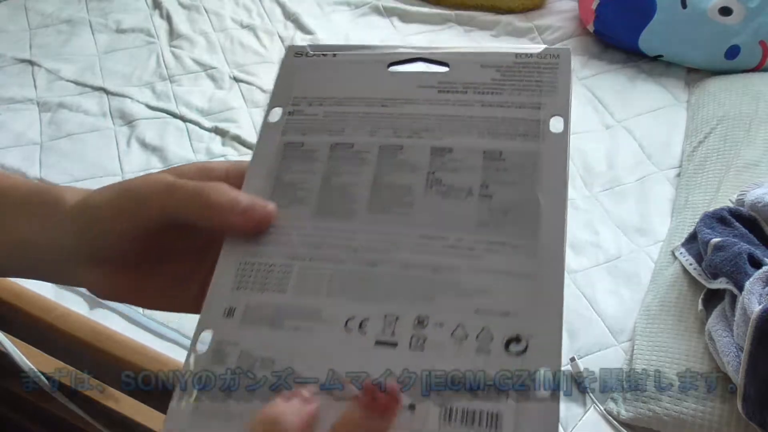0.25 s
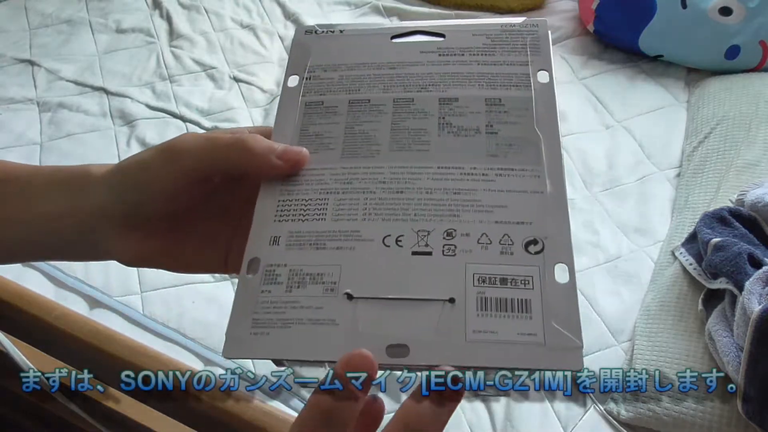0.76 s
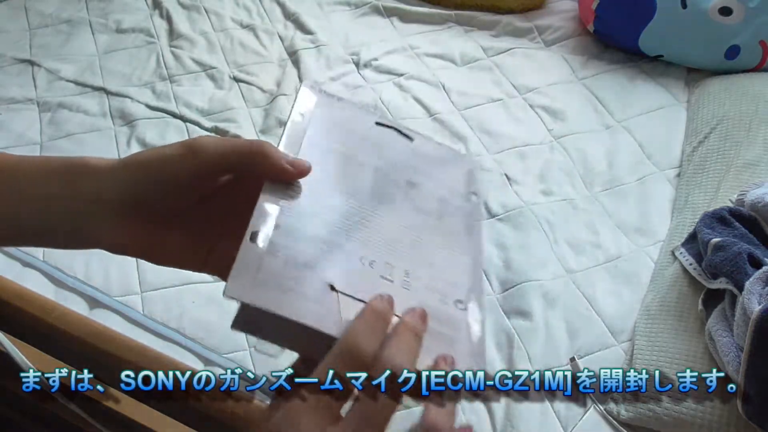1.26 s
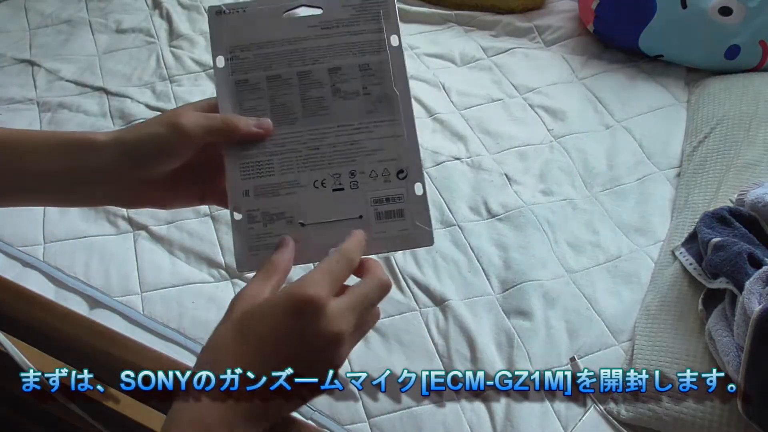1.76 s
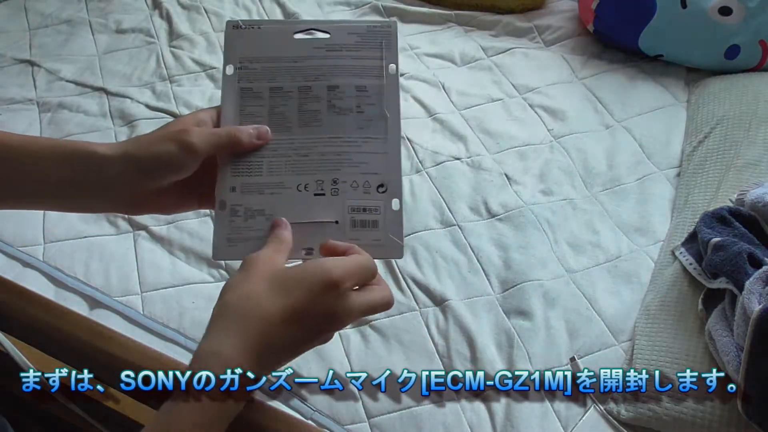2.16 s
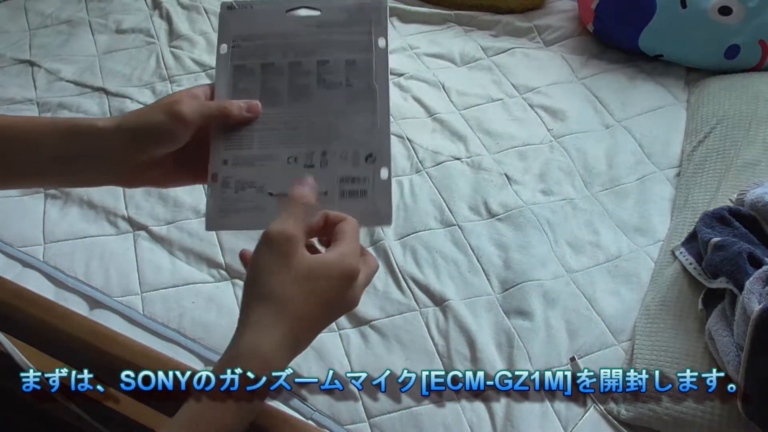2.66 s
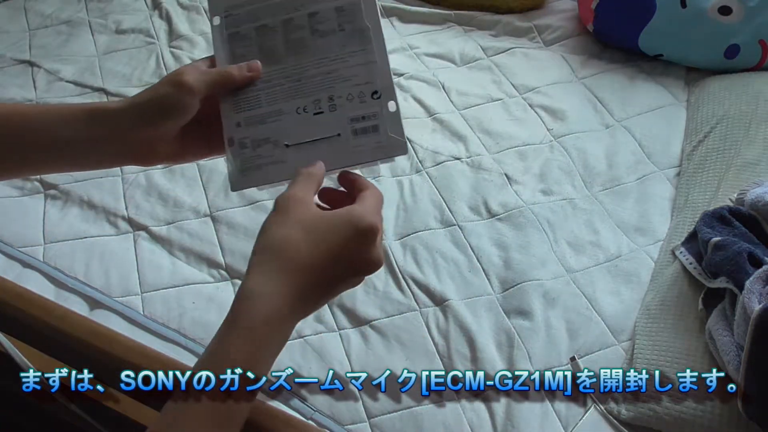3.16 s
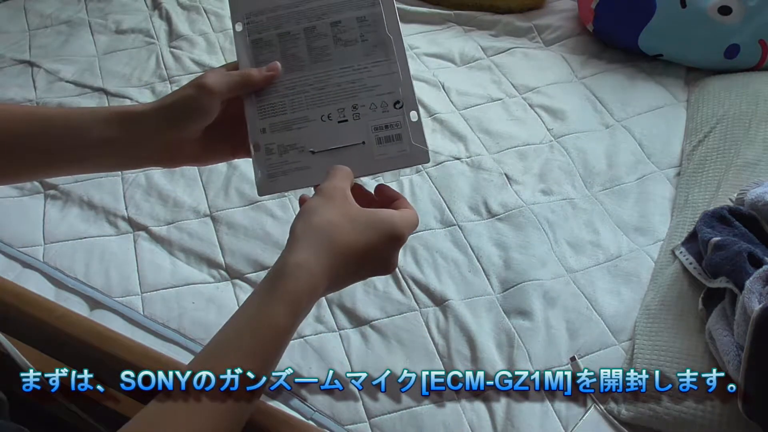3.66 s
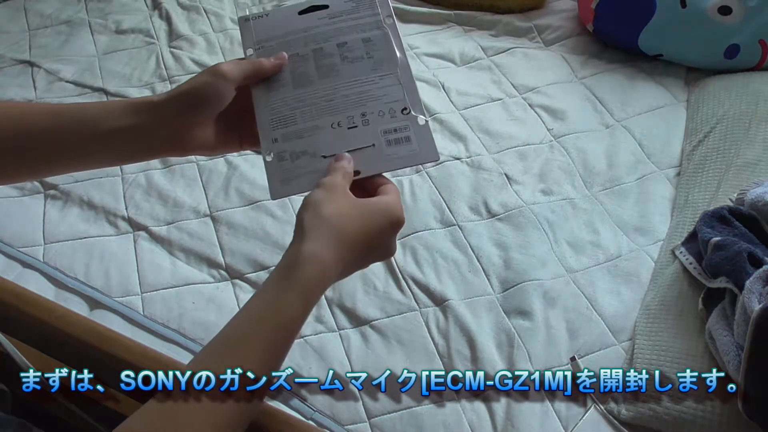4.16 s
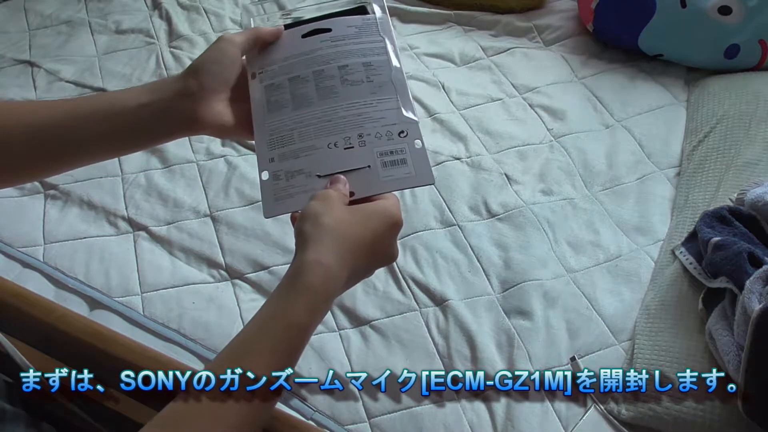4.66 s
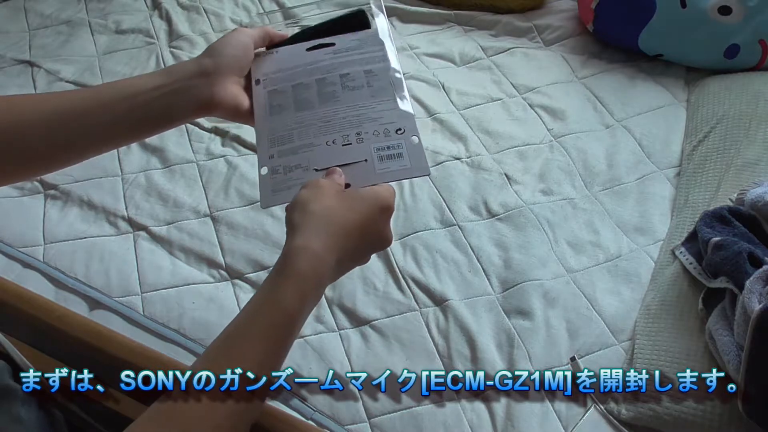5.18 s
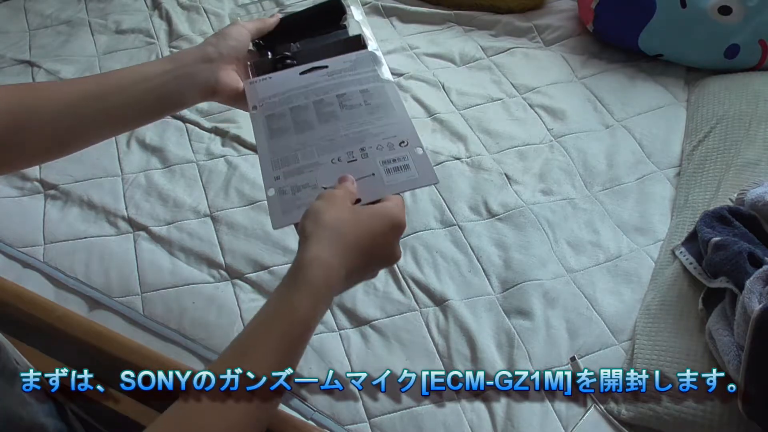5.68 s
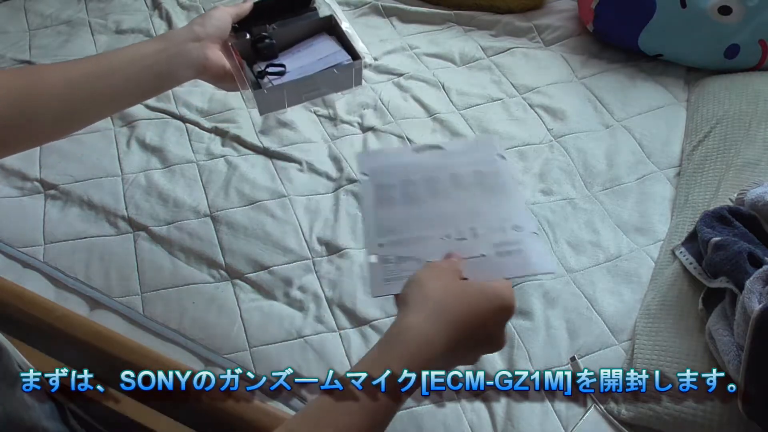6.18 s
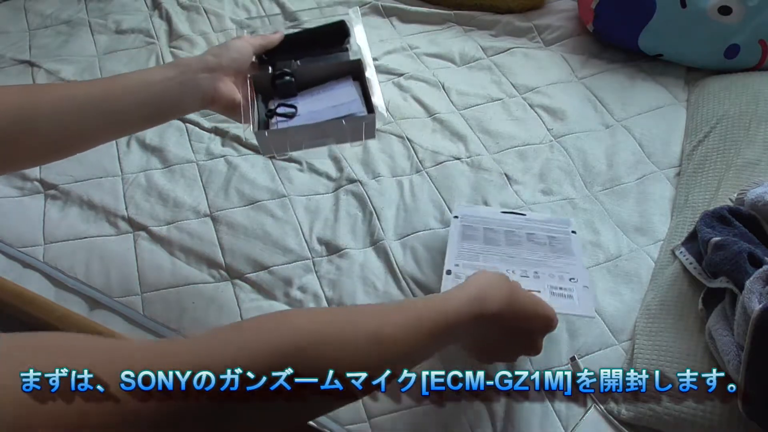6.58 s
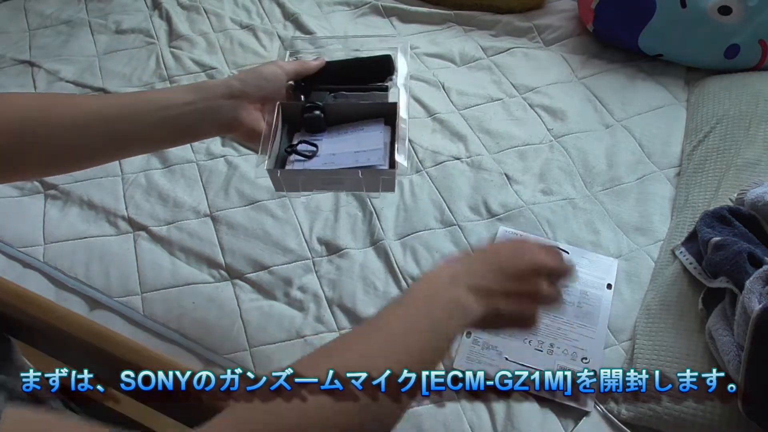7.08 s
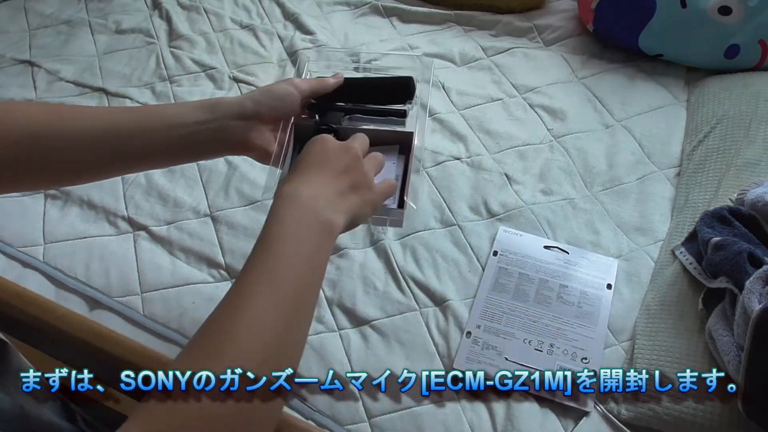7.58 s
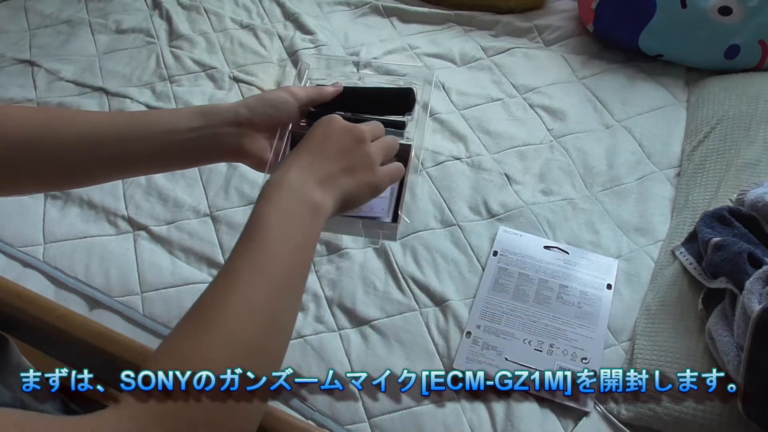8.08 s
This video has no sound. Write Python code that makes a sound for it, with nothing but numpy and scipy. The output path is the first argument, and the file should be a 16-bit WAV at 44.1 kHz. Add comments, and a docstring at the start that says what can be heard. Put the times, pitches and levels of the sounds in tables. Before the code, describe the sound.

Close stereo microphones in a small, soft bedroom pick up a stiff plastic pack being handled. Soft finger rubs and small ticks come first, then a sharp snap and a run of bright clicks as fingers pick at the edge. The paper card then slides out in several dry, rasping pulls, followed by a few looser knocks and a faint rustle. A steady, muffled ventilation rush with faint hum lies underneath.

```python
"""A steady ventilation rush with light finger rubs, then snaps and ticks of a stiff plastic blister pack.
Hands turn the pack, pick at its edge and slide the backing card out, which rasps in several pulls.
Snaps are bursts of tiny slips ringing panel and shell; the rasp is friction ringing card, shell and edge.
The rush is filtered noise with a faint hum; the room is small and soft, heard by two close microphones."""
import sys
import numpy as np
from scipy import signal
from scipy.fft import rfft, irfft
from scipy.io import wavfile
from scipy.ndimage import uniform_filter1d

SR = 44100
rng = np.random.default_rng(int(sys.argv[2]) if len(sys.argv) > 2 else 0)


def int16_out(signal):
    """Quantize to a 16-bit WAV file."""
    q = np.round(np.clip(np.atleast_2d(signal).T, -1, 1) * 32767)
    wavfile.write(sys.argv[1], SR, q.astype(np.int16))


N = 367353

# ventilation rush and microphone hiss, spectrum shape: freq_hz [Hz], density_db [dB per Hz, relative]
AIR_SPECTRUM = [(25, -25.5), (60, -20.5), (110, -12), (230, 2.5), (430, -4.5), (560, -2.5), (850, -10),
                (1500, -18.5), (1800, -27.5), (2400, -26), (2800, -30.5), (6200, -37), (8600, -29.5),
                (9700, -23.5), (10700, -28.5), (15500, -32)]
# likeness of the rush at the two microphones: freq_hz [Hz], likeness [-1..1]
AIR_LIKENESS = [(40, 0.15), (130, 0.89), (290, 0.87), (650, 0.55), (1400, 0.17), (6000, 0.4),
                (15000, -0.33)]
# light rubs of fingers and card on the pack:
# start_s [s], length_s [s], level_db [dB], card_body_db [dB re level], edge_fizz_db [dB re level]
RUB_EVENTS = [(-.04, 0.33, -64.5, 3, 6), (.17, 0.273, -68, 2, 5.5), (1.29, 0.21, -76.5, 10.5, 8),
              (1.398, 0.068, -57, -2.5, 0), (1.51, 0.2, -63.5, 3, 8.5), (1.75, 0.18, -64.5, -3, 0.5),
              (1.915, 0.11, -64, 5.5, -4.5), (2.0, 0.22, -60, 3, 2.5), (2.17, 0.25, -62.5, 2.5, 1),
              (2.66, 0.21, -65.5, -5, -4), (2.75, 0.074, -56, -1, -0.5), (2.841, 0.055, -56.5, 0.5, -4),
              (2.891, 0.096, -59, 3, -2.5), (3.141, 0.048, -60, 1.5, -1.5), (3.26, 0.2, -70.5, 2, -2),
              (4.86, 0.23, -67, -1, -3), (6.39, 0.097, -74.5, -2, 4), (7.013, .055, -60, 6, 5.5),
              (7.525, 0.31, -65.5, 9, -.5), (7.78, 0.41, -78.5, 9, 0)]
# snaps and taps on the pack: start_s [s], contact_s [s], thump_db [dB], panel_pitch_hz [Hz],
# panel_db [dB], shell_pitch_hz [Hz], shell_db [dB], crack_db [dB]
SNAP_EVENTS = [(0.163,0.0056,-56,594,-48,4650,-69,-51), (0.287,.0015,-65,726,-54,4770,-67,-61),
               (.385,0.0074,-48,684,-49,4500,-53.5,-52.5), (1.153,0.0072,-44,660,-40.5,4900,-60,-49),
               (1.199,0.0016,-54,555,-53,4640,-58,-55.5), (1.5014,0.00051,-34,950,-29,4240,-34.5,-41),
               (1.507,0.0031,-44.5,704,-40,4620,-57,-52), (1.618,0.016,-51,570,-43,4950,-49.5,-65),
               (1.689,0.025,-51,557,-40,4100,-60,-56.5), (2.08,0.0026,-45,657,-34.5,2330,-38,-49),
               (2.0811,0.0023,-43,497,-43,4080,-31,-33), (2.192,0.011,-45,580,-46.5,4990,-52,-53),
               (2.233,0.0068,-52,643,-44.5,4450,-47,-53), (2.3314,0.0009,-51,584,-52,3560,-46.5,-52),
               (2.422,0.0065,-49,550,-33.5,4000,-39,-44.5), (2.443,0.0032,-50,550,-41.5,4460,-47,-61),
               (2.528,.0022,-52,586,-54,4100,-63.5,-70), (2.6165,0.0016,-39,727,-27.5,4500,-25.5,-30),
               (2.779,0.0047,-49,620,-48.5,4330,-39,-40.5), (2.801,0.0023,-43.5,577,-42,3530,-51,-59),
               (2.8795,0.0011,-56,507,-45.5,4330,-50,-52), (3.294,0.0014,-66,464,-46.5,4550,-53.5,-54),
               (3.326,0.0044,-52,460,-46.5,4280,-64,-66), (3.4065,0.0064,-62,540,-37.5,4300,-46.5,-48),
               (3.5201,0.0008,-64,570,-42,4060,-37.5,-41), (4.261,.002,-50,493,-57,4500,-59.5,-69),
               (5.303,0.004,-44.5,630,-43,3760,-47.5,-51), (5.564,0.0046,-58,543,-53.5,5100,-58.5,-65),
               (5.966,0.0063,-64,723,-30.5,4270,-55,-59), (5.98,0.0079,-45,770,-46,4400,-35.5,-35.5),
               (6.083,0.0072,-66,573,-69,3740,-48,-38.5), (6.934,0.021,-39.5,670,-35,3570,-47.5,-41.5),
               (7.0641,0.00055,-44,1146,-42.5,4000,-42,-40), (7.068,0.0081,-47,980,-47,4500,-46,-55),
               (7.27,0.016,-43,725,-40.5,3620,-50,-48), (7.538,0.011,-58,1000,-50.5,3300,-56,-59)]
# the whole pack pushed against the hand: freq_hz [Hz], gain_db [dB, relative]
THUMP_BODY = [(40, -40.5), (110, -7), (180, -6), (250, 6), (360, -3), (520, -17), (1200, -39)]
# a flat panel flexing: pitch_multiple [times its pitch], gain_db [dB, relative]
PANEL_BODY = [(.3, -30), (.6, -7), (.8, -2), (1.0, 0), (1.4, -5), (1.9, -8), (2.6, -15), (6.0, -33.5)]
# the stiff moulded shell: pitch_multiple [times its pitch], gain_db [dB, relative]
SHELL_BODY = [(.15, -41), (0.363, -13), (.52, -16.5), (0.639, -14.5), (.77, -1.5), (.93, 2), (1.08, 1.5),
              (1.249, 2), (1.499, -13.5), (2.198, -16.5)]
# the bare crack of buckling plastic: freq_hz [Hz], gain_db [dB, relative]
CRACK_BODY = [(900, -35), (2100, -5), (3000, -5), (5500, 8.5), (7300, 5.5), (9300, 5.5), (11600, -1.5),
              (13200, -6.5), (15500, -27)]
# pulls of the card along the shell: start_s [s], rise_s [s], length_s [s], level_db [dB],
# sag_db [dB lost over the length], card_body_db [dB re level], edge_fizz_db [dB re level],
# card_resonance_hz [Hz at the start], edge_resonance_hz [Hz]
PULL_EVENTS = [(3.8, 0.053, 0.1, -47.5, 3.5, 2.5, 3, 593, 11500),
               (3.963, 0.047, 0.14, -46, -3, 1.5, 0.5, 608, 7700),
               (4.305, 0.047, 0.28, -44.5, 21, 0, -1, 1380, 7070),
               (4.527, .12, 0.26, -64, -3, -3, 5, 1016, 7300),
               (5.053, 0.088, 0.3, -67.5, -6, 4, 0, 1280, 10600),
               (5.276, 0.064, 0.16, -45.5, 2.5, -1, 2.5, 696, 7700),
               (5.484, 0.047, 0.13, -66.5, 1.5, 2.5, 5, 755, 6930),
               (5.617, 0.07, 0.089, -45, 2, -1.5, 3, 788, 6700),
               (5.698, 0.047, 0.25, -51, 6, -5.5, 2, 1324, 8050),
               (5.915, 0.095, 0.066, -41, 7.5, 3.5, 2, 803, 8400)]
# the card as a sounding board: freq_hz [Hz], gain_db [dB, relative]
CARD_BODY = [(120, -19), (300, 1), (650, 3.5), (1000, 4.5), (1500, 0), (2150, -3), (2700, -14.5),
             (5000, -47)]
# fizz of the thin edges under friction: freq_hz [Hz], gain_db [dB, relative]
EDGE_BODY = [(3000, -57.5), (5200, -7), (6300, 0), (7300, 2), (8700, 1.5), (9800, -4), (11600, -2.5),
             (13200, -12), (15500, -27.5)]
# bedroom reverberation: freq_hz [Hz], t60_s [s]
ROOM_DECAY = [(200, 0.16), (700, 0.16), (1800, 0.18), (4200, 0.15), (8000, 0.16), (14000, 0.047)]
# left microphone over right for the pack's sound: freq_hz [Hz], left_over_right_db [dB]
MIC_BALANCE = [(120, 0), (250, -1), (500, 0.5), (1000, 1.5), (2000, 0), (4000, -2.2), (8000, -0.6),
               (12000, -5)]
# phase lead of the left microphone for the pack's sound: freq_hz [Hz], lead_rad [radians]
MIC_LEAD = [(2000, 0.049), (6800, 0.49), (8400, 1.54), (9200, 1.2), (10300, 0.92), (13000, 0.79),
            (15000, 1.2)]
# where the sound comes from as the hands move: time_s [s], left_over_right_db [dB]
HAND_PAN = [(1.15, 0.5), (1.5, 2.5), (2.1, 2), (2.6, 2.3), (3.8, 1.5), (6.0, 1.5), (6.95, 2.5), (7.3, 2.5)]

AIR_DB, HUM_HZ, HUM_DB = -52.5, 340.5, -65
HOLD_DB = -84  # the hands never lie quite still on the pack
# a rub swells faster than it fades; then the pitches of card, shell and edge under a finger
RUB_SKEW, RUB_CARD_HZ, RUB_SHELL_HZ, RUB_EDGE_HZ = 0.57, 857, 4600, 7400
PANEL_OVERTONE = 1.75  # a panel's second mode over its first
SHELL_HZ = 4030  # reference pitch of the shell's broad sound
SHELL_WANDER, CARD_WANDER = 0.049, 0.037  # rms share by which the grip bends each resonance
RELEASE_DB_PER_S, STOP_S = 426, 0.01  # how fast a pull dies once the hand stops; how softly it eases off
BODY_SAG = 0.58  # share of the sag that the card body follows: a slowing pull turns dull
PULL_SHELL_HZ = 3870  # the shell's pitch at the start of a pull
GLIDE_PER_S = 0.65  # share by which card and shell rise in pitch per second of pull
CUTOFF_HZ = 15900
TAPS = 4096  # samples in a snap and in the spectra of the bodies


def amp(db):
    """Decibels to gain."""
    return 10 ** (np.asarray(db) / 20)


def unit(x):
    """Scales to an rms of one."""
    return x / np.sqrt(np.mean(x ** 2) + 1e-20)


def read(points, hz):
    """Reads a table along a log-frequency axis."""
    f, value = np.transpose(points)
    return np.interp(np.log(hz + 1e-6), np.log(f), value)


def add(mix, s, sound):
    """Mixes a sound in at s seconds."""
    part = mix[max(round(s * SR), 0):][:len(sound)]
    part += sound[:len(part)]


def drift(per_s):
    """Slow random wander of rms one, with per_s turning points drawn each second."""
    knots = np.arange(0, N + SR, SR / per_s)
    return unit(np.interp(np.arange(N), knots, rng.standard_normal(len(knots))))


def ring(x, shape, pitch=1):
    """Passes x through a causal, minimum-phase body with the given spectrum, falling away past its ends."""
    f = np.fft.rfftfreq(TAPS, 1 / SR).clip(1) / pitch
    outside = abs(np.log(f / np.clip(f, shape[0][0], shape[-1][0])))
    log_gain = np.log(amp(read(shape, f))) - np.minimum(2 * outside, np.pi)
    circle = np.r_[log_gain, log_gain[-2:0:-1]]
    # the Hilbert transform of the log gain gives the minimum phase
    response = np.fft.ifft(np.exp(np.conj(signal.hilbert(circle)))).real
    return signal.oaconvolve(x, response[:TAPS // 2])[:len(x)]


def resonate(x, hz, width):
    """A resonance of gain one, width in Hz, that follows the curve hz."""
    turn = np.exp(2j * np.pi * np.cumsum(hz) / SR)
    r = np.exp(-np.pi * width / SR)
    # shift the resonance down to zero, smooth, and shift back up
    return 2 * (turn * signal.lfilter([1 - r], [1, -r], x / turn)).real


def sing(x, hz, width, ring_db):
    """A body's broad sound with one mode ringing out of it."""
    mode = resonate(x, np.full(len(x), hz), width)
    return unit(x) + amp(ring_db) * unit(mode)


def broadband(x, size=45):
    """Evens out the broad humps of a burst's spectrum, so that it drives every resonance alike."""
    z = rfft(x)
    humps = np.sqrt(abs(uniform_filter1d(abs(z) ** 2, size)) + 1e-12)
    return irfft(z / humps, len(x))


def air(waver_db=-0.33):
    """Steady ventilation with a faint motor hum, over the hiss of the microphones."""
    hz = np.fft.rfftfreq(N, 1 / SR)
    a, b = rfft(rng.standard_normal((2, N)))
    same = np.clip(read(AIR_LIKENESS, hz), -1, 1)
    pair = np.array([a, same * a + np.sqrt(1 - same ** 2) * b])
    rush = unit(irfft(pair * amp(read(AIR_SPECTRUM, hz)), N))
    hum_phase = 2 * np.pi * np.cumsum(HUM_HZ + 1.3 * drift(per_s=6)) / SR
    hum = np.sqrt(2) * np.sin(hum_phase)
    return amp(AIR_DB + waver_db * drift(per_s=7.4)) * rush + amp(HUM_DB) * hum


def rub(t, start, length, level_db, body_db, fizz_db):
    """A light touch swells and fades in one arch: gains of shell, body and fizz, then three resonances."""
    gain = amp(level_db) * np.sin(np.pi * np.clip((t - start) / length, 0, 1) ** RUB_SKEW)
    return np.broadcast_arrays(gain, gain * amp(body_db), gain * amp(fizz_db),
                               RUB_CARD_HZ, RUB_SHELL_HZ, RUB_EDGE_HZ)


def snap(row, slips, jolt=3.3, spread_db=2.5, brief_s=0.0012, panel_ring_db=-5.5):
    """Plastic gives way in a burst of tiny slips; each spot rings its own modes of panel and shell."""
    s, contact, thump_db, panel_hz, panel_db, shell_hz, shell_db, crack_db = row
    lead = 256  # samples kept ahead of the snap
    u = np.arange(TAPS) / SR / max(contact, 1e-4)  # time in contact lengths
    envelope = (u + 0.17) * np.exp(-1.7 * u) * 3
    burst = slips[0] * amp(spread_db * slips[1]) * envelope
    burst[0] += jolt * np.exp(-contact / brief_s)  # the briefer the contact, the stronger its clean jolt
    burst = broadband(np.roll(burst, lead))

    panel = sing(ring(burst, PANEL_BODY, panel_hz), panel_hz, width=56, ring_db=panel_ring_db)
    panel = sing(panel, panel_hz * PANEL_OVERTONE, width=140, ring_db=-19.5)
    # the broad sound follows the spot's pitch only halfway
    shell = ring(burst, SHELL_BODY, np.sqrt(SHELL_HZ * shell_hz))
    shell = sing(shell, shell_hz, width=280, ring_db=-4.5)
    layers = [(thump_db, ring(burst, THUMP_BODY)), (panel_db, panel),
              (shell_db, shell), (crack_db, ring(burst, CRACK_BODY))]
    per_10_ms = np.sqrt(.01 * SR / TAPS)  # levels count a layer's whole energy as if spread over 10 ms
    return s - lead / SR, per_10_ms * sum(amp(db) * unit(sound) for db, sound in layers)


def snaps():
    """All the snaps and taps, each driven by its own random slips."""
    out = np.zeros(N)
    all_slips = rng.standard_normal((len(SNAP_EVENTS), 2, TAPS))
    for row, slips in zip(SNAP_EVENTS, all_slips):
        add(out, *snap(row, slips))
    return out


def pull(t, start, rise, length, level_db, sag_db, body_db, fizz_db, card_hz, edge_hz):
    """The card gets going, slows or gathers speed, and stops: gains of shell, body, fizz; three resonances."""
    age = t - start
    sag = sag_db * np.clip((age - rise) / max(length - rise, .001), 0, 1)
    onset = np.sin(np.pi / 2 * np.clip(age / rise, 0, 1)) ** 2
    release_db = RELEASE_DB_PER_S * STOP_S * np.logaddexp(0, (age - length) / STOP_S)
    gain = onset * amp(level_db - release_db)
    climb = 1 + GLIDE_PER_S * np.clip(age, 0, length)
    return np.broadcast_arrays(gain * amp(-sag), gain * amp(body_db - BODY_SAG * sag),
                               gain * amp(fizz_db - sag), card_hz * climb, PULL_SHELL_HZ * climb, edge_hz)


def strokes():
    """Pulls and rubs add in power; the strongest of the moment sets the resonances of card, shell and edge."""
    t = np.arange(0, N / SR, .001)
    moves = [pull(t, *row) for row in PULL_EVENTS] + [rub(t, *row) for row in RUB_EVENTS]
    level, body, fizz, card_hz, shell_hz, edge_hz = np.stack(moves, axis=1)
    gains = [np.sqrt((gain ** 2).sum(0) + amp(HOLD_DB) ** 2) for gain in (level, body, fizz)]
    strongest = level.argmax(0), np.arange(len(t))
    pitches = [hz[strongest] for hz in (card_hz, shell_hz, edge_hz)]
    return [np.interp(np.arange(N) / SR, t, control) for control in (*gains, *pitches)]


def slide(catches_per_s=9000, slowing=.9, spread_db=3.0, smooth=0.93, judder_db=0.8,
          card_ring_db=-6.5, shell_ring_db=-7, edge_ring_db=-6, uneven_db=1.5):
    """Paper fibres catch and let go up to thousands of times a second, shaking card, shell and edge."""
    level, body, fizz, card_hz, shell_hz, edge_hz = strokes()
    # a slow, light touch breaks up into separate crackles
    rate = catches_per_s * (level / level.max()) ** slowing
    catches = (rng.random(N) < rate / SR) * rng.choice([-1, 1], N) / np.sqrt(rate)
    catches = catches * amp(spread_db * np.minimum(rng.exponential(1, N), 5))
    friction = unit(catches) + smooth * rng.standard_normal(N)
    friction = friction * amp(judder_db * drift(per_s=240))

    # the free length of card and the squeeze on the shell pick out one resonance in each
    card_hz = card_hz * (1 + CARD_WANDER * drift(per_s=14))
    shell_hz = shell_hz * (1 + SHELL_WANDER * drift(per_s=30))
    card = unit(sing_along(ring(friction, CARD_BODY), card_hz, 12, card_ring_db))
    shell = unit(sing_along(ring(friction, SHELL_BODY, SHELL_HZ), shell_hz, 400, shell_ring_db))
    # each pull has its own hiss; the rubs share one
    edge = unit(sing_along(ring(friction, EDGE_BODY), edge_hz, 2900, edge_ring_db))

    # the contact wanders, so each part swells on its own
    parts = (level * shell, body * card, fizz * edge)
    return sum(part * amp(uneven_db * drift(per_s=45)) for part in parts)


def sing_along(x, hz, width, ring_db):
    """A body's broad sound with one mode that moves along the curve hz."""
    return unit(x) + amp(ring_db) * unit(resonate(x, hz, width))


def room(x, tail_db, near_db, wall_s=0.0052, shared=0.51):
    """Direct sound, close scatter and a short diffuse tail; the microphones differ more in the treble."""
    count = SR // 3
    t = np.arange(count) / SR
    late, near = rng.standard_normal((2, 2, count))
    late *= t > wall_s
    near *= (rng.random((2, count)) < .2) * (t > .001) * np.exp(-t / 0.0078)  # sparse early reflections
    hz, when, z = signal.stft(np.array([late, near]), SR, nperseg=256)
    z[0] *= amp(-60 * when / read(ROOM_DECAY, hz)[:, None])
    # blend the two microphones, less and less towards the treble
    alike = (shared / (1 + (hz / 5500) ** 4))[:, None]
    z = (z + alike * z[:, ::-1]) / np.sqrt(1 + alike ** 2)
    late, near = signal.istft(z, SR, nperseg=256)[1][..., :count]
    response = amp(tail_db) * late / np.linalg.norm(late[0])
    response += amp(near_db) * near / np.linalg.norm(near[0])
    response[:, 0] += 1  # direct sound
    return signal.oaconvolve(x[None], response, axes=1)[:, :N]


def scene():
    """The pack in the room, its overall balance a little to the left, over the room's own rush."""
    hits = snaps()
    low = signal.sosfilt(signal.butter(1, 1300, fs=SR, output="sos"), hits)
    # the pack's low tones spread all round and fill the room more than its cracks do
    knocks = room(low, tail_db=-8.0, near_db=-6.0)
    clicks = room(hits - low, tail_db=-12.0, near_db=-21.0)
    rasp = room(slide(), tail_db=-14.0, near_db=-13.5)
    pack = knocks + clicks + rasp

    hz = np.fft.rfftfreq(N, 1 / SR)
    balance = amp(read(MIC_BALANCE, hz) / 2)
    mics = np.array([balance, np.exp(-1j * read(MIC_LEAD, hz)) / balance])
    side = amp(np.interp(np.arange(N) / SR, *np.transpose(HAND_PAN)) / 2)
    return irfft(rfft(pack) * mics, N) * np.array([side, 1 / side]) + air()


def record(dry):
    """Band limit of the microphones: a steep linear-phase low-pass."""
    low_pass = signal.firwin(511, CUTOFF_HZ, window=("kaiser", 9), fs=SR)
    return signal.oaconvolve(dry, low_pass[None], "same")


dry = scene()
out = record(dry)
int16_out(out)
```